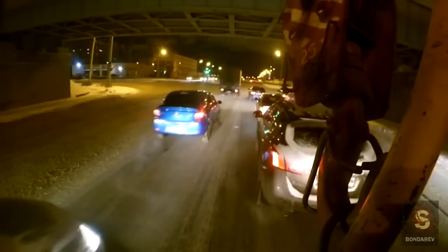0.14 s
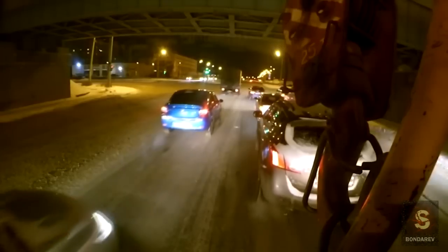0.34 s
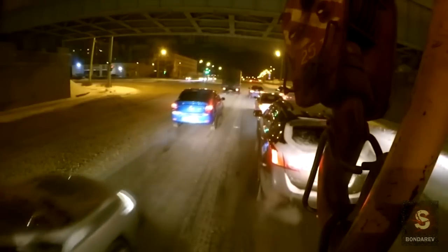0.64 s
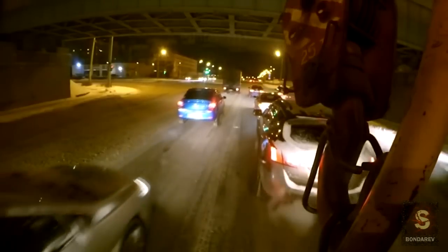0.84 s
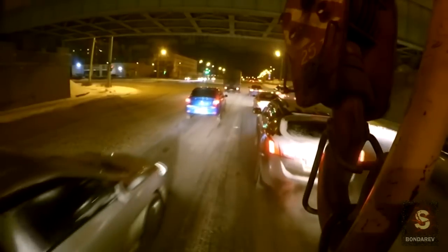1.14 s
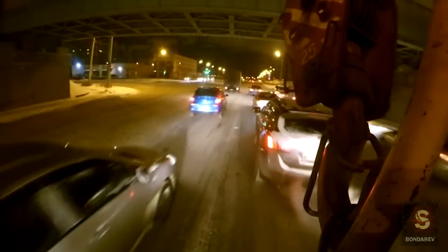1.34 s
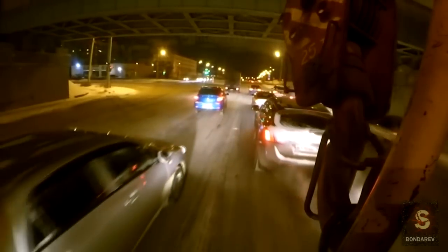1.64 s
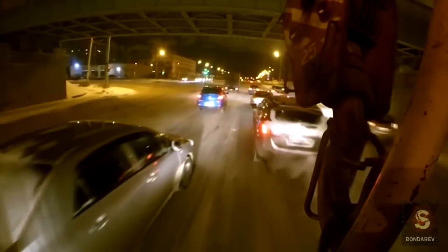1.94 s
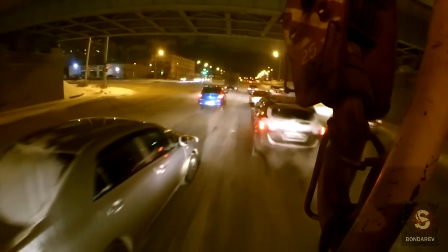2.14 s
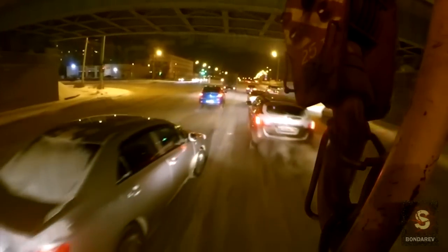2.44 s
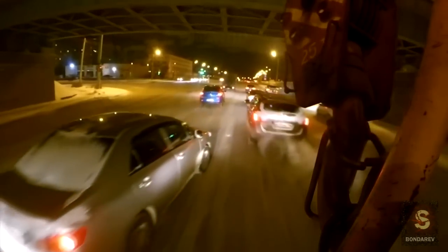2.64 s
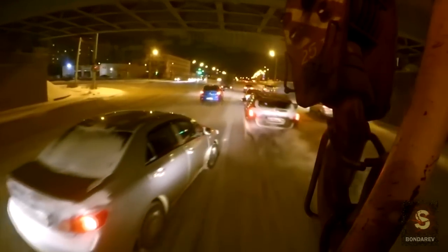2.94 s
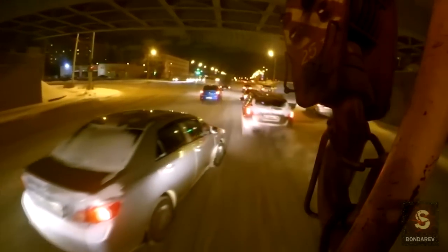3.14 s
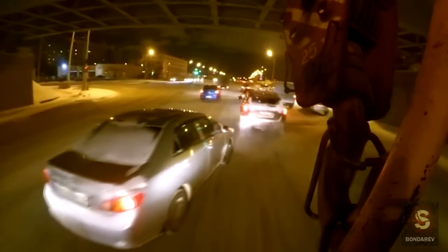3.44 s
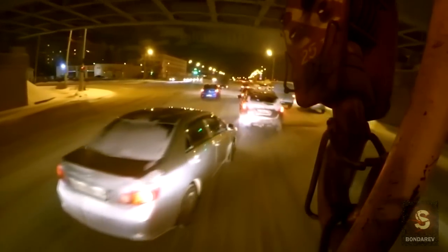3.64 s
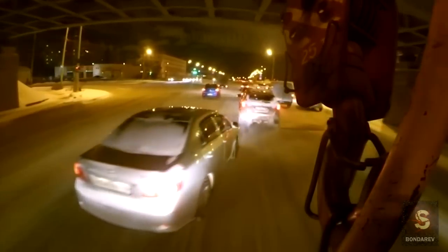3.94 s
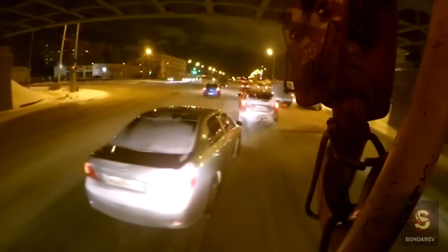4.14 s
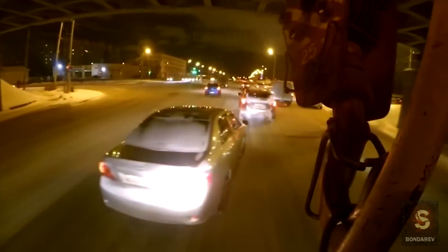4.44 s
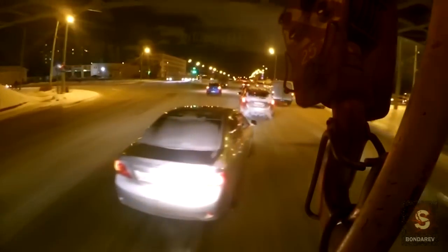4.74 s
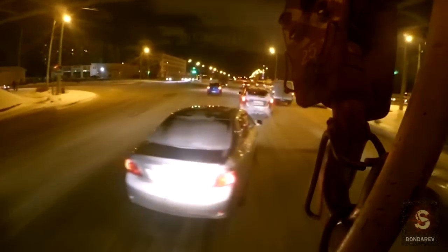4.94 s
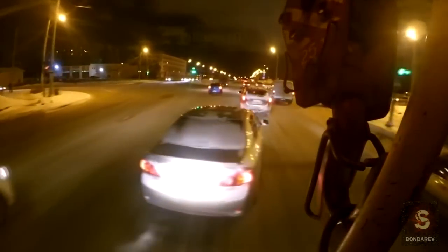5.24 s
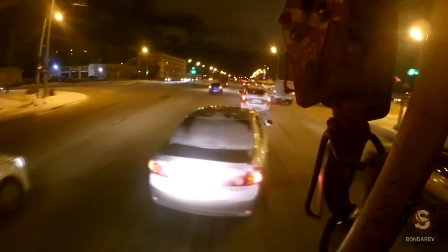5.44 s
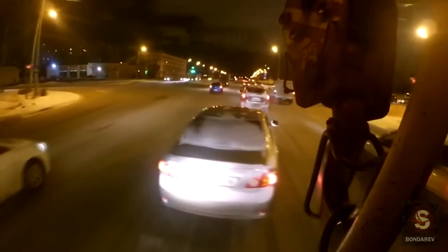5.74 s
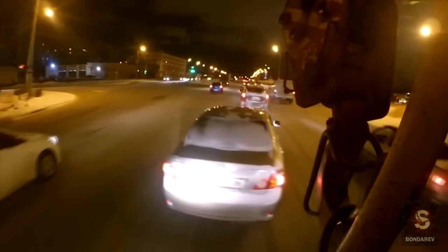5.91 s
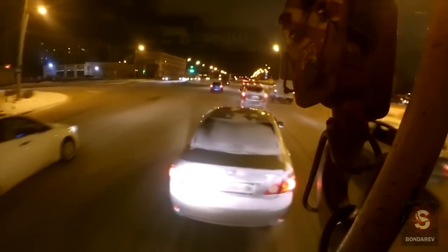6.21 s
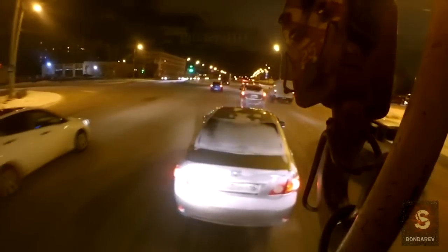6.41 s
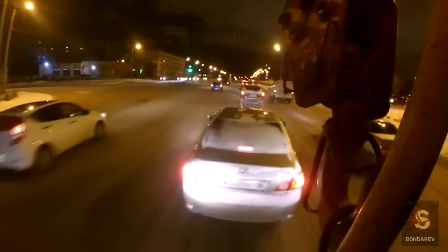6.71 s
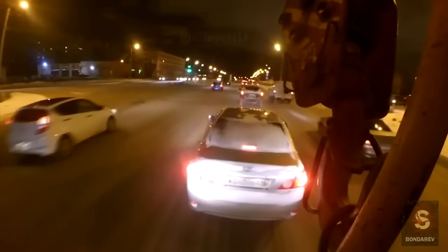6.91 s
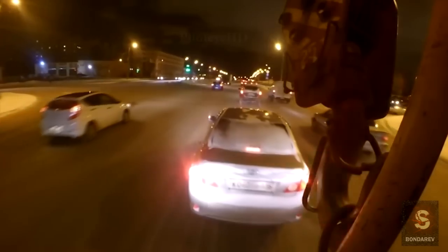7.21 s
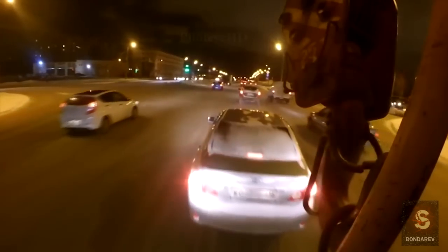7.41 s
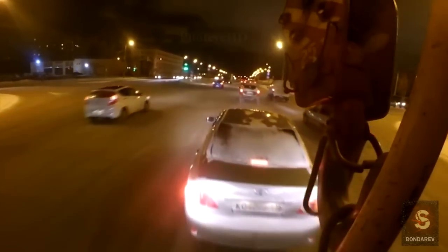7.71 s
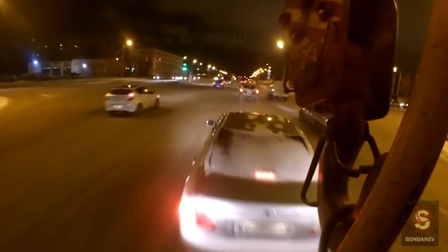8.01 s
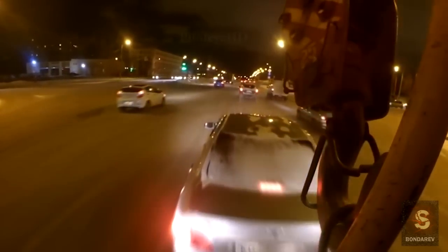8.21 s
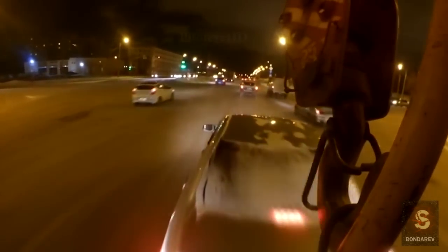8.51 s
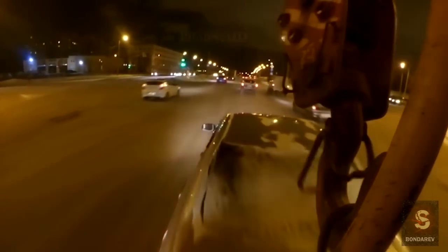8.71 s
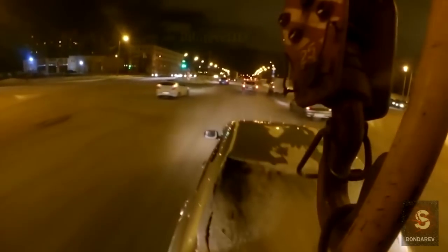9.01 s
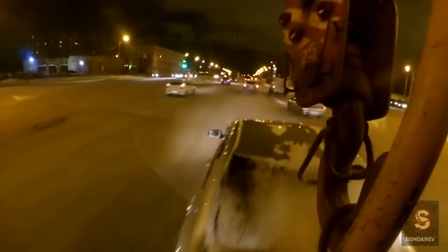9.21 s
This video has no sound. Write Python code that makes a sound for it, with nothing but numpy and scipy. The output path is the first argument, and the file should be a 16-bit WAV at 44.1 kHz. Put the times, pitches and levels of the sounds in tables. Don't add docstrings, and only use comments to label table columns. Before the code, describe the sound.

Outside a heavy diesel truck on a night city street, caught by a camera in a closed housing clamped to the body. A boomy low hum and road rumble dominate. The engine pulls away, dips, then revs steadily to a peak with a thin breathy whistle, drops back and slows. Small metal ticks come and go; a sudden stop brings a heavy thump and a crowd of rattles.

```python
import sys
import numpy as np
from scipy import signal
from scipy.fft import rfft, irfft
from scipy.io import wavfile
from scipy.ndimage import uniform_filter1d

SR = 44100
rng = np.random.default_rng(int(sys.argv[2]) if len(sys.argv) > 2 else 0)


def gain_from_db(level_db):
    decades = np.asarray(level_db, float) / 20
    return 10 ** decades


def to_wav(sig):
    pcm = np.clip(np.atleast_2d(sig), -1, 1) * 32767
    pcm = np.round(pcm).astype(np.int16)
    wavfile.write(sys.argv[1], SR, pcm.T)


N = 412776


def level(x, db=0):
    return x * gain_from_db(db) / np.sqrt(np.mean(x ** 2))


def curves(table):
    s, *columns = np.transpose(table)
    return [np.interp(np.arange(N) / SR, s, c) for c in columns]


def spells(table, edge_s):
    t = np.arange(N) / SR
    total = 0
    for start, length, *steps in table:
        inside = np.minimum(t - start, start + length - t)
        total = total + np.outer(steps, np.clip(inside / edge_s + .5, 0, 1))
    return total


def walk(rate):
    hold = int(SR / rate)
    steps = np.repeat(rng.standard_normal(N // hold + 1), hold)
    return level(uniform_filter1d(uniform_filter1d(steps, hold), hold)[:N])


def turns(hz):
    return np.cumsum(hz) / SR


def tone(cycles):
    return np.sqrt(2) * np.sin(2 * np.pi * cycles)


# frequency in Hz, width in Hz, level in dB.
SHELL_MODES = [(45, 25, -36.5), (93.3, 16.5, -35.5), (148.3, 12.6, -43.5), (204.5, 12.8, -45),
               (261.4, 38, -43), (331, 47, -49.5), (445, 21, -57), (530, 20.9, -46), (614, 32, -63),
               (922.3, 51, -51), (1083, 58, -63), (1437, 204, -59.5), (1731, 156, -52.5),
               (2494, 126, -59.5), (2650, 356, -63), (3523, 160, -67.5), (3810, 150, -70.5),
               (4410, 130, -70.5), (5620, 280, -70.5), (6180, 450, -74.5), (7600, 570, -80.5)]
# frequency in Hz, level in dB.
WALL_LEAK = [(15, -34), (100, -61.5), (180, -70), (700, -87.5), (2000, -71), (5000, -78.5), (9000, -93.5),
             (15500, -104), (22050, -110)]
# frequency in Hz, width in Hz, level in dB.
SHELL_DIPS = [(183, 23, -1.5), (7080, 420, -1.5), (3230, 150, -2.5)]


def housing(x):
    size = 2 ** 14
    hz = np.maximum(np.fft.rfftfreq(size, 1 / SR), 1)
    leak_hz, leak_db = np.transpose(WALL_LEAK)
    power = gain_from_db(2 * np.interp(np.log(hz), np.log(leak_hz), leak_db))
    for f, width, db in SHELL_MODES:
        power = power + gain_from_db(2 * db) / (1 + (2 * (hz - f) / width) ** 2) ** 1.39
    for f, width, db in SHELL_DIPS:
        power = power * gain_from_db(2 * db * np.exp(-((hz - f) / width) ** 2))
    cepstrum = irfft(np.log(power) / 2)
    cepstrum[1:size // 2] *= 2
    cepstrum[size // 2 + 1:] = 0
    response = irfft(np.exp(rfft(cepstrum)))
    return irfft(rfft(x) * rfft(response, N), N)


BAND_EDGES = (115, 430, 3150)


def split_bands(x):
    hz = np.fft.rfftfreq(N, 1 / SR)
    lows = [0] + [1 / (1 + (hz / f) ** 8) for f in BAND_EDGES] + [1]
    spectrum = rfft(x)
    return [irfft(spectrum * (b - a), N) for a, b in zip(lows, lows[1:])]


# time in seconds, turns per second.
CRANK_SPEED = [(0, 16), (1.3, 19.5), (1.8, 17.8), (2.3, 15.7), (2.55, 13), (3, 15.6), (3.5, 19.3),
               (4, 22.3), (4.5, 25.5), (5, 29), (5.37, 31.8), (5.6, 32.7), (5.92, 33.6), (6.3, 30.9),
               (6.8, 26.4), (7.3, 23), (8.2, 16), (9.36, 13)]


def crank_speed():
    return curves(CRANK_SPEED)[0]


# time in seconds, clatter level in dB.
ENGINE_EFFORT = [(0, -49.5), (.25, -46.5), (.55, -48), (.84, -50), (.9, -43.5), (1.1, -41), (2, -42),
                 (2.6, -42.5), (3.8, -38.5), (5.25, -33.5), (5.7, -32.5), (5.95, -33), (6.7, -40),
                 (7.1, -42), (7.9, -43.5), (8.42, -48), (8.5, -45), (9.36, -48.5)]
# start in seconds, length in seconds, change in dB.
PEDAL_DABS = [
    (.28, 0.244, 4.5),
    (7.24, .31, 5),
]
WORK_DB = -42


def engine_effort():
    return curves(ENGINE_EFFORT)[0] + spells(PEDAL_DABS, 0.022)[0] - WORK_DB


# start in seconds, length in seconds, cab shake in dB, boom in dB.
ROAD_BUMPS = [(0, 0.53, 7, -2.5), (.98, .3, 5, -1), (1.45, .5, 1, -2), (2.0, 0.21, 7, -0.5),
              (2.42, 0.29, 10.5, -1), (2.97, 0.73, 6, -1.5), (3.7, 0.11, 12.5, -1.5), (3.87, 0.25, 10, 1.5),
              (4.3, 0.5, 9, 0), (5.17, 0.17, 15.5, 0), (5.42, .6, 9.5, 2), (6.05, 1.07, 8.5, 4),
              (7.1, 0.49, 12, 2), (7.6, 0.65, 8.5, 2), (8.44, 0.24, 16.5, 10.5), (8.67, .11, 14, 1),
              (8.78, 0.13, 14.5, 10.5), (9.02, 0.33, 11.5, 1)]


def road_and_boom(effort_db):
    shake, boom, _, _ = split_bands(housing(rng.standard_normal(N)))
    shake = shake - signal.sosfilt(signal.butter(1, [56, 74], "band", fs=SR, output="sos"), shake)
    bump_shake_db, bump_boom_db = spells(ROAD_BUMPS, .05)
    shake_db = bump_shake_db - 41.5 + 1.2 * walk(9)
    boom_db = bump_boom_db - 44.5 + 0.92 * effort_db + .5 * walk(8)
    return level(shake, 0.91) * gain_from_db(shake_db) + level(boom, 3.04) * gain_from_db(boom_db)


# start in seconds, length in seconds, push on the low shell modes in dB.
LOAD_CHANGES = [
    (.92, 1.15, 4),
    (7.6, 0.77, -5),
]


def clatter_and_hiss(crank, effort_db):
    firing = 3 * turns(crank)
    strength = gain_from_db(3 * rng.standard_normal(N // 100))[firing.astype(int)]
    knock = 1 + 0.41 * strength * np.exp(-(firing % 1) / 0.24)
    strikes = (rng.random(N) < 60 / SR) * np.minimum(rng.exponential(size=N), 2.5)
    buzz = signal.lfilter([1], [1, -.99], strikes)

    clatter = split_bands(housing(rng.standard_normal(N) * knock))[2]
    heavy = signal.sosfiltfilt(signal.butter(2, 1150, fs=SR, output="sos"), clatter)
    clatter = clatter + heavy * (gain_from_db(spells(LOAD_CHANGES, 0.24)[0]) - 1)
    hiss = split_bands(housing(rng.standard_normal(N) * (knock + 0.34 * buzz)))[3]

    waver_db = .6 * walk(14)
    clatter_db = WORK_DB + effort_db + waver_db
    hiss_db = -55.5 + 0.99 * effort_db + 0.0873 * (crank - 20) + waver_db + .5 * walk(16)
    return level(clatter, -.3) * gain_from_db(clatter_db) + level(hiss, -.3) * gain_from_db(hiss_db)


RING_BAND = (5450, 6350)


def loose_metal(events, rise_s, ring_db, body_db, crack_db):
    ring, body, crack = np.zeros((3, N))
    t = np.arange(int(.25 * SR)) / SR
    for s, event_ring_db, event_body_db, event_crack_db, t60 in events:
        i = int(s * SR)
        shape = ((1 - np.exp(-t / rise_s)) * gain_from_db(-60 * t / t60))[:N - i]
        ring[i:i + len(t)] += gain_from_db(event_ring_db) * shape ** 2.04
        body[i:i + len(t)] += gain_from_db(event_body_db) * shape ** 0.6
        crack[i:i + len(t)] += gain_from_db(event_crack_db) * shape
    chatter = rng.standard_normal(N) * gain_from_db(2.5 * walk(400))
    unit = [np.std(band) for band in split_bands(housing(chatter))]
    ring_filter = signal.butter(2, RING_BAND, "band", fs=SR, output="sos")
    ring_sound = signal.sosfilt(ring_filter, ring * chatter)
    body_sound = split_bands(housing(body * chatter))[2] / unit[2]
    crack_sound = split_bands(housing(crack * chatter))[3] / unit[3]
    return gain_from_db(ring_db) * ring_sound + gain_from_db(body_db) * body_sound + gain_from_db(crack_db) * crack_sound


# time in seconds, ring in dB, body in dB, crack in dB.
METAL_TICKS = [(2.4448, -44, -39, -71), (2.584, -43, -32.5, -72), (2.6838, -47, -40, -73),
               (2.7327, -35, -39, -66), (2.7796, -37.5, -48, -71), (3.039, -39, -32.5, -70),
               (3.0919, -40, -38, -75), (3.444, -37, -29, -71), (4.6356, -44, -27.5, -54),
               (6.5, -48, -26.5, -72), (7.274, -50, -47, -76), (7.4091, -38, -41, -67),
               (7.5837, -38, -49, -73), (7.7837, -45, -39, -72), (7.8406, -40, -36, -64),
               (7.9654, -37, -50, -59), (8.0166, -47, -37, -77), (8.3548, -43, -54, -70)]


def metal_ticks():
    events = [(*row, 0.062) for row in METAL_TICKS]
    return loose_metal(events, 0.00055, 5.7, -6.5, 6)


# time in seconds, ring in dB, body in dB, crack in dB, seconds to fall by 60 dB.
STOP_RATTLE = [(8.4124, -60, -52, -75.5, 0.11), (8.4675, -53, -40, -64.5, 0.11),
               (8.4986, -43, -41, -81.5, 0.12), (8.5105, -37, -48, -66, 0.067),
               (8.556, -48, -41, -76, 0.14), (8.568, -32, -33.5, -62, 0.094),
               (8.581, -46, -38.5, -56, 0.067), (8.614, -55, -62, -82, 0.12),
               (8.6547, -38.5, -35.5, -55, 0.094), (8.7064, -44.5, -44, -80, 0.15),
               (8.7176, -37, -41.5, -64.5, 0.1), (8.788, -38, -35.5, -63, 0.098),
               (8.8583, -48, -59, -70, 0.1), (8.89, -54.5, -39, -72, 0.04),
               (8.9261, -57.5, -59.5, -76, 0.088), (8.969, -34, -55, -64.5, 0.1),
               (8.995, -52, -39.5, -58, 0.22), (9.066, -57, -45, -79, 0.094),
               (9.0916, -55, -50, -59.5, 0.086), (9.1062, -51, -50, -70.5, 0.063),
               (9.1801, -42, -44, -72, 0.079), (9.217, -51, -43, -73, 0.11), (9.3343, -48, -46, -76, 0.12)]


def stop_rattle():
    return loose_metal(STOP_RATTLE, 0.00037, 7.4, -1.8, 12.8)


def panel_thud():
    t = np.arange(N) / SR - 8.26
    return gain_from_db(-39) * np.exp(-(t / .06) ** 2) * tone(207 * t)


# time in seconds, frequency in Hz, level in dB.
SHAFT_HUM = [(3.8, 17, -67.5), (4.6, 39, -53), (5.4, 23.9, -38), (6.5, 23.1, -43.5), (7.4, 23, -27),
             (8, 15, -46), (8.4, 27, -58.5)]


def drive_shaft():
    hz, db = curves(SHAFT_HUM)
    return gain_from_db(db) * tone(turns(hz))


# time in seconds, shaft speed in Hz, level in dB.
TURBO_SPIN = [(4.7, 960, -18), (5.2, 1050, -3), (5.45, 1105, 0), (5.7, 1123, 0), (5.9, 1108, 0),
              (6.1, 1068, -3), (6.35, 1000, -20)]
# multiple of the shaft speed, level in dB, pitch blur in Hz.
TURBO_TONES = [(1, -52, 3), (5.55, -60, 35), (5.72, -58, 12), (5.9, -64, 20), (7, -64, 10)]


def turbo_whistle():
    spin, spin_db = curves(TURBO_SPIN)
    whistle = 0
    for multiple, db, blur in TURBO_TONES:
        hz = multiple * spin + blur * walk(60)
        whistle = whistle + gain_from_db(db + spin_db + 3 * walk(30)) * tone(turns(hz))
    return whistle


def fan(crank):
    blades = 8
    lift_db = 5.5 * np.exp(-((blades * crank - 258.2) / 6.2) ** 2)
    fan_db = -47 + 2.5 * (crank - 25) + lift_db
    return gain_from_db(fan_db + 2.1 * walk(14)) * tone(blades * turns(crank) + .25 * walk(25) / (2 * np.pi))


# multiple of the crank speed, level in dB.
FIRING_TONES = [(3, 0), (3.5, -12), (4.5, -20), (6, -24)]
# multiple of the crank speed, level in dB.
LOWER_TONES = [(1, -10), (1.5, -2), (2, 0)]
# crank turns per second, firing tones in dB, lower tones in dB.
ENGINE_MOUNTS = [(13, -35, -48.5), (17, -34, -46), (19.5, -40.5, -46.5), (21.9, -27, -43),
                 (25.5, -40, -32.5), (29.2, -35.5, -25), (32.3, -40.5, -36), (31, -47.5, -46.5)]
# start in seconds, length in seconds, change in dB.
PEDAL_RELEASE = [
    (5.9, 4, -9),
]


def engine_tones(crank):
    cycle = turns(crank)
    speed, *mount_levels = np.transpose(ENGINE_MOUNTS)
    release_db = spells(PEDAL_RELEASE, .2)[0]
    tones = 0
    for orders, mount_db in zip((FIRING_TONES, LOWER_TONES), mount_levels):
        swell_db = np.interp(crank, speed, mount_db) + release_db
        for multiple, db in orders:
            tones = tones + gain_from_db(db + swell_db + 1.8 * walk(6)) * tone(multiple * cycle + rng.random())
    return tones


# start in seconds, rise in seconds, left of the last swing in dB, top in dB.
ARM_SWINGS = [(.01, .06, -28.5, -24.5), (.3, 0.27, -35.5, -23.5), (.65, 0.038, -48, -34),
              (.85, .09, -41, -24.5), (1.14, 0.074, -33, -33), (1.51, 0.064, -36, -23.5),
              (1.62, 0.042, -41, -26.5), (1.74, 0.2, -37, -28), (1.98, .11, -34, -32.5),
              (2.34, 0.28, -42, -19), (2.66, 0.22, -33, -19.5), (3.33, .1, -29, -30),
              (3.58, 0.35, -39, -16.5), (4.17, 0.37, -38, -23), (4.56, 0.024, -35, -21.5),
              (4.64, 0.15, -41, -29), (4.87, .08, -33, -17.5), (5.01, .12, -31, -16.5),
              (5.21, .2, -29, -20), (5.69, 0.13, -26.5, -16.5), (6.1, 0.28, -26.5, -21),
              (6.55, 0.12, -34, -18), (7.17, 0.27, -21.5, -18.5), (7.49, 0.32, -25, -19.5),
              (7.99, 0.083, -36.5, -25.5), (8.41, 0.16, -33, -18.5), (8.58, 0.12, -31, -11),
              (8.89, .13, -36.5, -23.5), (9.07, 0.054, -36, -24.5), (9.18, 0.19, -28.5, -24.5)]
# start in seconds, length in seconds, shift in Hz.
PITCH_PULLS = [
    (1.08, 0.44, -5),
    (2.03, .3, 3),
    (3.32, 0.23, -4),
    (4.6, .25, -4.5),
    (7.9, 0.27, -3),
]


def clamp_arm():
    start, rise, left_db, top_db = np.transpose(ARM_SWINGS)
    t = np.arange(N) / SR
    k = np.maximum(np.searchsorted(start, t) - 1, 0)
    top_s = start + rise
    end_s = np.append(start[1:], N / SR + rise[-1])
    rising = (t - start[k]) / rise[k]
    falling = (end_s[k] - t) / (end_s - top_s)[k]
    place = np.clip(np.minimum(rising, falling), 0, 1)
    low = gain_from_db(np.append(left_db, -30)[k + (t > top_s[k])])
    swing = low + (gain_from_db(top_db[k]) - low) * np.sin(np.pi / 2 * place) ** 1.5
    swing = np.minimum(swing * gain_from_db(1.14 * walk(9)), gain_from_db(-15.2))
    hz = 64.7 + spells(PITCH_PULLS, .08)[0] + .5 * walk(12)
    return swing * tone(turns(hz))


def scene():
    crank = crank_speed()
    effort_db = engine_effort()
    road = road_and_boom(effort_db) + clatter_and_hiss(crank, effort_db)
    metal = metal_ticks() + stop_rattle() + panel_thud()
    machine = drive_shaft() + turbo_whistle() + fan(crank) + engine_tones(crank)
    return (road + metal + machine + clamp_arm())[None]


def band_limit(x):
    return signal.sosfilt(signal.butter(12, 15610, fs=SR, output="sos"), x)


def record(dry):
    fade = np.minimum(np.arange(N)[::-1] / (.006 * SR), 1)
    clipped = np.clip(dry, -.272, .272) * fade
    top_cut = signal.ellip(8, .2, 40, 15700, fs=SR, output="sos")
    return band_limit(signal.sosfilt(top_cut, clipped))


dry = scene()
out = record(dry)
to_wav(out)
```